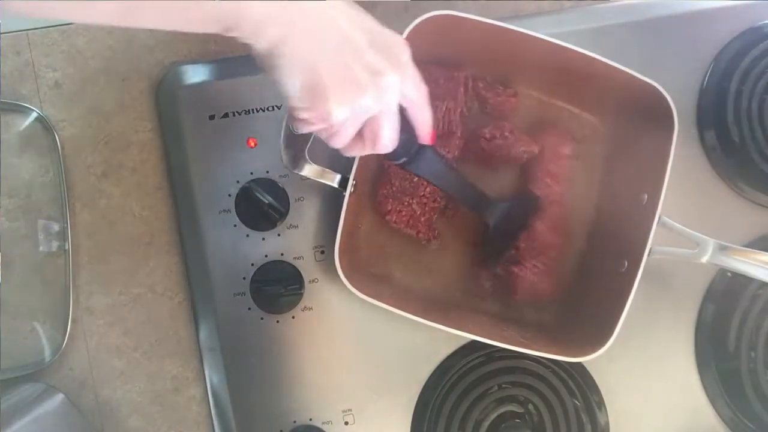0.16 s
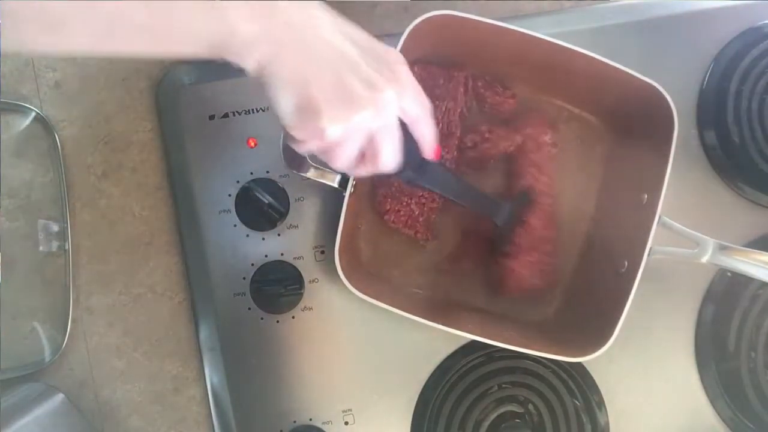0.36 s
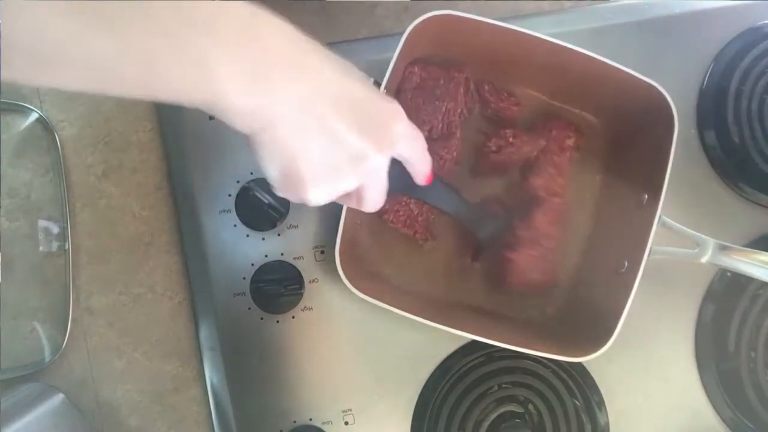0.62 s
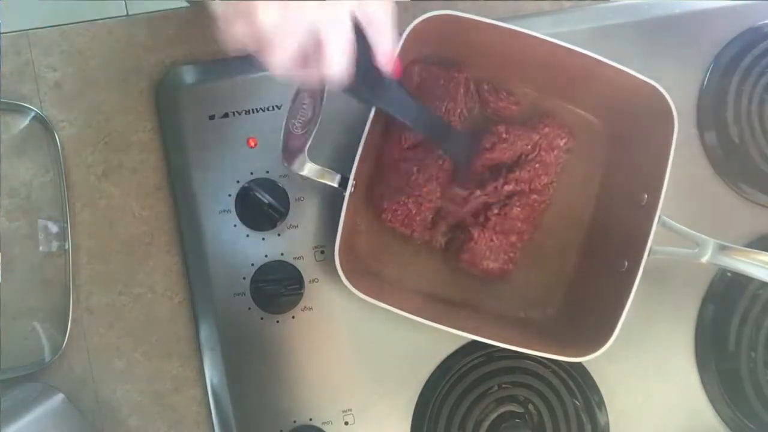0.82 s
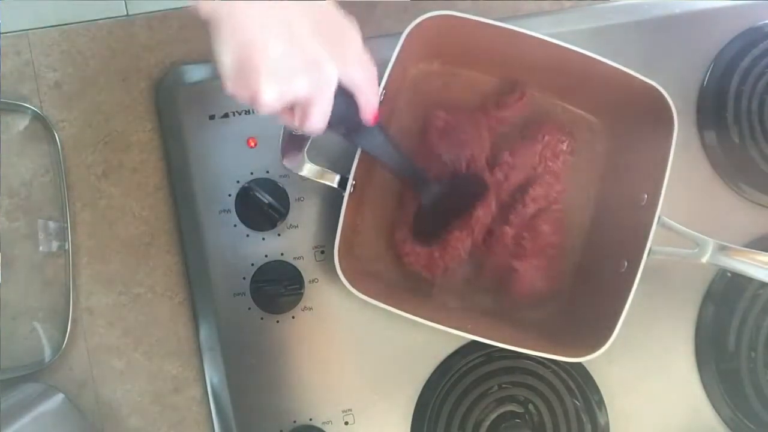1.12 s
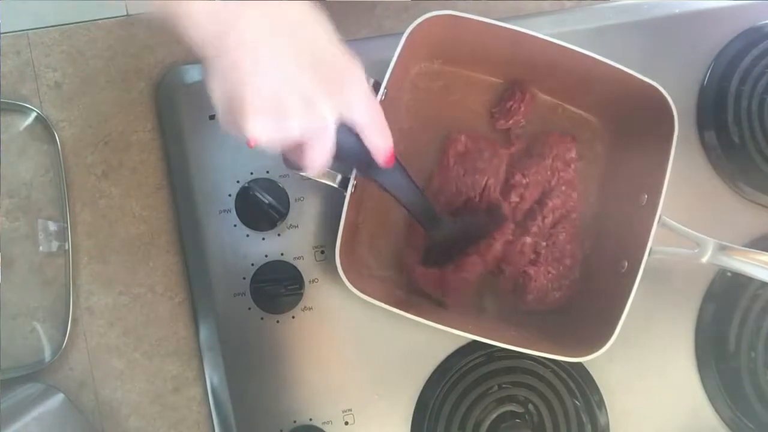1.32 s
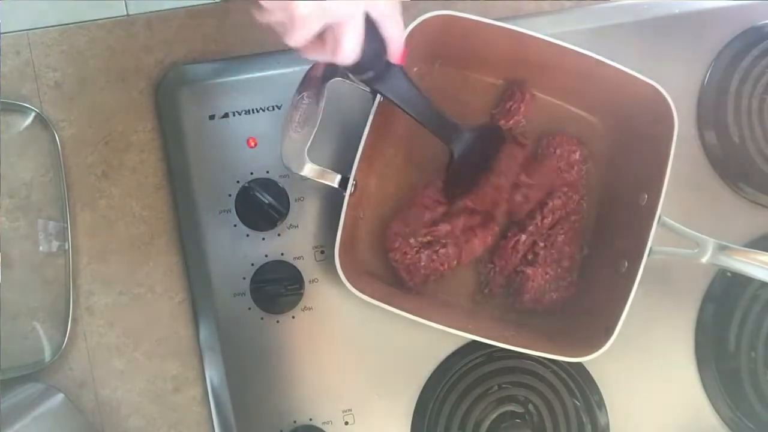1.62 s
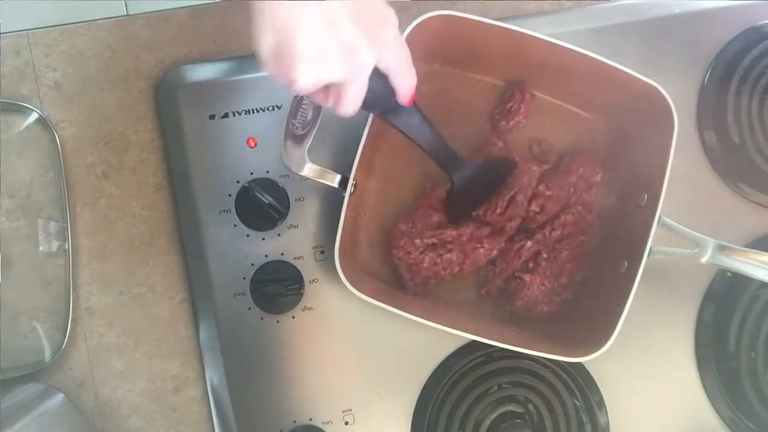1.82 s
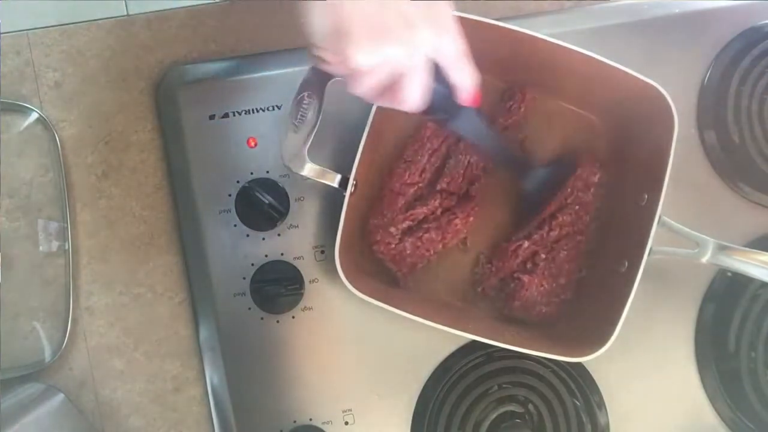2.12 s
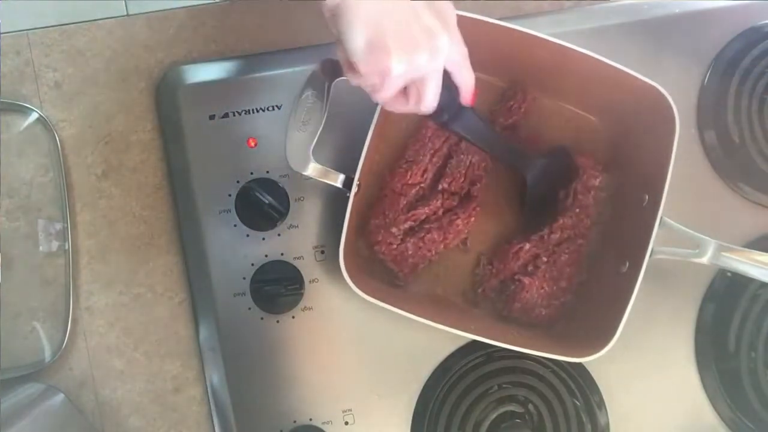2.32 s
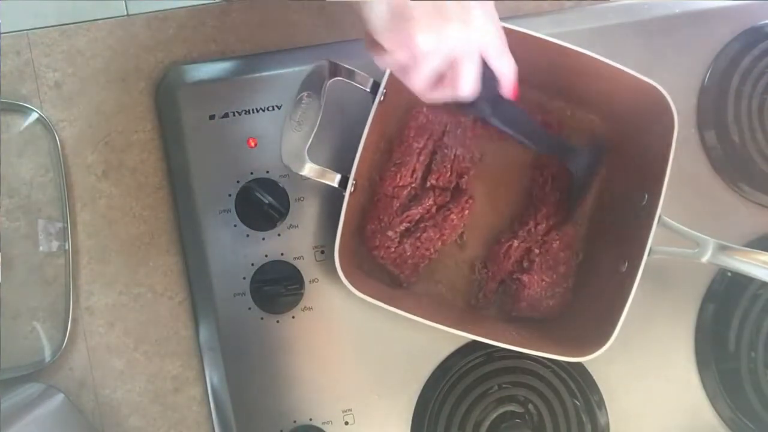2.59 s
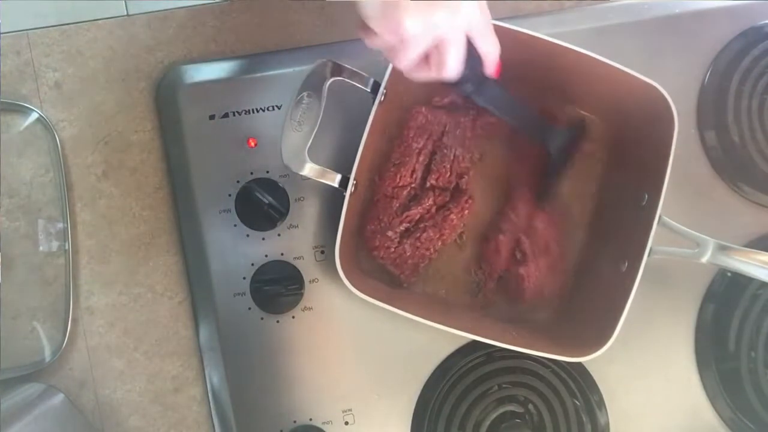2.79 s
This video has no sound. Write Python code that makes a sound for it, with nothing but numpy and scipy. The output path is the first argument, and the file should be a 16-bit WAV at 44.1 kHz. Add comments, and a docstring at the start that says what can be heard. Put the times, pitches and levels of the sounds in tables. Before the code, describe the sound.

Ground meat sizzles densely and steadily in hot oil for about 3 seconds, close up, left channel only. Spits and crisp snaps pepper it, clustered around 0.2 and 0.6-0.9, with sharp cracks near 2.3 and 2.5. A plastic utensil taps the pan dully at 0.17 and 1.1, harder around 2.3-2.45 and 2.8. Faint low drags come at 1.0 and 2.5-2.75, over barely audible kitchen rumble and hum.

```python
"""Meat frying in a pan

Ground meat fries in hot oil while a plastic utensil pushes it about, over a low kitchen rumble and hum.
Thousands of random filtered clicks a second make the steam bubbles; noise makes the hiss beneath them.
Spits are quick volleys of clicks, snaps are single clicks, and knocks add a fading ring of the pan.
Drags mix a wavering low tone with rubbing noise. Only the left channel carries sound."""
import sys
import numpy as np
from scipy import signal
from scipy.fft import rfft, irfft
from scipy.io import wavfile

SR = 44100
rng = np.random.default_rng(int(sys.argv[2]) if len(sys.argv) > 2 else 0)


def output_pcm(signal):
    """Save a mono or channel-first signal as 16-bit PCM at the path in sys.argv[1].

    Samples are clipped to [-1, 1] before scaling.
    """
    pcm = np.clip(np.atleast_2d(signal).T, -1, 1) * 32767
    wavfile.write(sys.argv[1], SR, np.round(pcm).astype(np.int16))


N = 130095  # length in samples

# All levels below are before the room echoes and the microphone gain.
# tone colour of the frying, relative: f/Hz, level/dB
SIZZLE_COLOUR = [(100, -26.5), (300, -51), (430, -24.5), (620, -25), (820, -20.5), (1050, -13), (1400, -11),
                 (1900, -7), (2350, -6.5), (2600, -1.85), (2900, -0.5), (3500, -2.5), (4400, -1.5),
                 (4900, -7.5), (5350, -3.5), (5750, -5), (6050, -7.5), (6650, -5), (7400, -11),
                 (9700, -13.5), (10400, -18.5), (11100, -15), (12300, -15.5), (15700, -18.5)]
# strength of the frying over time: t/s, level/dB
FRYING_LEVEL = [(0, -25.5), (.11, -25.5), (.15, -24), (.23, -26), (.28, -26), (.39, -25.5), (.6, -26.5),
                (.68, -27.5), (.8, -26.5), (.91, -26), (.98, -25.5), (1.1, -25.5), (1.3, -25.5), (1.5, -26),
                (1.72, -26.5), (1.85, -26.5), (2.1, -25.5), (2.27, -26.5), (2.55, -26), (2.95, -26.5)]
# boost or cut of the frying's treble over time: t/s, level/dB
TREBLE_LEVEL = [(0, -1.5), (.1, 0), (.3, 1), (.46, 0.5), (.62, 3.5), (.8, 2), (1.0, -1.5), (1.3, -0.2),
                (1.9, 0), (2.1, 0.5), (2.3, -1), (2.5, 2.5), (2.73, -.5), (2.84, 2), (2.95, .3)]
# tone colour of the kitchen rumble, relative: f/Hz, level/dB
RUMBLE_COLOUR = [(15, -33), (26, -27), (39, 2), (52, -2), (72, -9), (110, -7.5), (160, -13.5), (300, -21.5),
                 (600, -33), (3000, -41)]
# ways the pan rings, damped by the meat: f/Hz, relative level/dB, time to fade by 60 dB/s
PAN_MODES = [(368.5, -13, 0.15), (525, -7.5, 0.24), (692, -9.5, 0.36), (786, -3.5, 0.14), (893, -1.5, 0.11),
             (1054, 4, 0.078), (1297, 2.5, 0.081), (1648, 3.5, 0.13), (2660, 6.5, 0.074), (4650, -4, 0.026)]
# utensil knocks on the pan: t/s, peak level/dB, centre f/Hz
KNOCKS = [(0.1675, -19, 1700), (.3578, -26, 855), (0.789, -32, 800), (.9225, -27, 910), (1.1199, -20, 1050),
          (1.357, -29.5, 786), (1.4252, -29.5, 925), (2.0304, -26.5, 1010), (2.08, -32, 860),
          (2.311, -17, 1290), (2.4142, -15, 1600), (2.44, -16.5, 1470), (2.488, -27, 900),
          (2.6688, -30, 895), (2.8005, -18.5, 1400), (2.9403, -24.5, 960)]
# spits, short volleys of large bubbles: t/s, level/dB, centre f/Hz before colouring, length/s
SPITS = [(.168, -26, 2160, .008), (0.184, -28.5, 1900, .011), (0.211, -27, 2540, .008),
         (0.309, -26, 2920, .005), (.357, -25.5, 3020, 0.011), (.447, -27, 3060, 0.0058),
         (.528, -24, 3020, 0.007), (0.55, -23.5, 2720, .008), (0.614, -23, 2980, .008),
         (0.629, -22.5, 2860, 0.0086), (0.726, -29, 2260, .007), (0.744, -24, 2780, .006),
         (0.817, -24.5, 3200, 0.0045), (0.853, -24, 2930, .008), (0.884, -26, 2300, 0.0047),
         (1.116, -24, 2830, .008), (1.227, -23, 2380, .006), (1.363, -23.5, 2600, 0.0085),
         (1.428, -40, 4000, .005), (1.438, -24, 3360, .005), (1.568, -25, 2640, .008),
         (1.597, -27, 2920, 0.0097), (1.632, -25, 2320, .007), (1.641, -23, 3230, .006),
         (1.693, -24, 2820, 0.0089), (1.719, -24, 2340, 0.0057), (1.964, -24, 2280, 0.0064),
         (2.087, -28, 3120, 0.0089), (2.236, -27, 2310, .006), (2.305, -31, 3600, .007),
         (2.392, -30, 3400, 0.0059), (2.412, -29, 2480, 0.0062), (2.438, -23.5, 2670, .006),
         (2.491, -30, 2980, 0.0099), (2.524, -24, 3030, 0.0058), (2.758, -32, 1690, 0.011)]
# snaps, single bursting drops: t/s, peak level/dB, centre f/Hz before colouring
SNAPS = [(0.2154, -12, 3000), (0.2208, -11, 4000), (0.234, -17, 4500), (0.244, -15, 4500),
         (0.252, -15, 4500), (.271, -13, 11000), (0.619, -17, 3800), (.637, -17, 2600), (.8566, -16, 3200),
         (0.8974, -13, 4500), (0.9044, -10, 12000), (1.0189, -14, 13000), (1.1071, -11, 10000),
         (1.2071, -15, 4500), (1.3595, -11, 8600), (1.6625, -12, 4500), (1.9707, -22, 3500),
         (2.3087, -8.5, 4200), (2.4404, -24, 3000), (2.4998, -9, 6000)]
# utensil drags over the pan bottom: t/s, length/s, level of the slip tone/dB, slip f/Hz
DRAGS = [(1.001, 0.19, -60, 322), (2.475, 0.155, -51, 257.5), (2.632, 0.13, -53, 304)]
# tone colour of the rubbing, relative: f/Hz, level/dB
RUB_COLOUR = [(20, -10), (42, 14), (75, -6), (120, -2), (180, -0.5), (350, -1), (470, -9), (1000, -40),
              (4000, -60)]

# small bubbles: total rate, mean and greatest boost of random sizes, width of each size's tone, level
POPS_PER_S, POP_SPREAD_DB, POP_MAX_DB, POP_OCTAVES, POP_DB = 14000, 2, 12, 0.43, -0.7
# slow random swings: rough time scale and strength, for clumps of bubbles and for the whole frying
CLUMP_S, CLUMP_DB, SURGE_S, SURGE_DB = 0.008, 1.2, 0.017, 0.07
HISS_DB, PAN_RING_DB, TREBLE_HZ = -7, -46.5, 6600
# larger bubbles: total rate, pitch range, cycles to fade to about a third, level
BUBBLES_PER_S, BUBBLE_LOW_HZ, BUBBLE_HIGH_HZ, BUBBLE_CYCLES, BUBBLE_DB = 450, 1001, 6017, 10.2, -8.5
RUMBLE_DB, HUM_HZ, HUM_DB = -59.5, 58, -60.5
# ring and bounce levels are relative to the first tick of a knock
KNOCK_RING_DB, KNOCK_OCTAVES, BOUNCE_S, BOUNCE_DB = -14, 0.72, 0.00196, -10.5
SPIT_PER_S, SPIT_OCTAVES, SNAP_OCTAVES = 2000, 0.38, 1
SLIP_JITTER, RUB_DB = 0.047, 3.5  # pitch wobble as a fraction; rubbing relative to the slip tone
ROOM_T60_S, ROOM_DB = 0.15, -6
MIC_GAIN_DB, EDGE_HZ = 5.5, 15740


def amp(db):
    """Turns decibels into gain."""
    return 10 ** (np.asarray(db) / 20)


def unit(x):
    """Scales a sound to an average strength (rms) of 1."""
    return x / np.sqrt(np.mean(x ** 2) + 1e-20)


def bins():
    """Frequencies on which colours are drawn, shifted by 1 Hz to avoid log of zero."""
    return np.fft.rfftfreq(4096, 1 / SR) + 1


def colour(points):
    """Gain per frequency, drawn between (Hz, dB) points on a musical pitch scale."""
    hz, db = np.transpose(points)
    return amp(np.interp(np.log(bins()), np.log(hz), db))


def bump(hz, octaves):
    """A broad hump of gain round one pitch."""
    return np.exp(-0.5 * (np.log2(bins() / hz) / octaves) ** 2)


def click(gain):
    """A click with this gain per frequency and its energy as early as possible (minimum phase)."""
    cepstrum = irfft(np.log(np.maximum(gain, 1e-5)))
    half = len(cepstrum) // 2
    # fold the mirrored half forward, so nothing sounds before the click
    cepstrum[1:half] *= 2
    cepstrum[half + 1:] = 0
    return irfft(np.exp(rfft(cepstrum)))[:half]


def ring(x, impulse):
    """Starts a copy of the impulse at every sample of x, scaled by that sample."""
    return signal.fftconvolve(x, impulse)[:len(x)]


def level(points):
    """Gain per sample from (s, dB) points."""
    return amp(np.interp(np.arange(N) / SR, *np.transpose(points)))


def wander(seconds):
    """Smooth random swings of rms 1; a longer time makes them slower."""
    hz = np.fft.rfftfreq(N, 1 / SR)
    noise = rfft(rng.standard_normal(N))
    return unit(irfft(noise * np.exp(-(hz * seconds) ** 2), N))


def add(mix, s, sound):
    """Mixes a sound in at a time."""
    part = mix[max(round(s * SR), 0):][:len(sound)]
    part += sound[:len(part)]


def bursts(per_s):
    """Random impulses of either sign, many small and a few large."""
    size = amp(np.minimum(POP_SPREAD_DB * rng.exponential(1, N), POP_MAX_DB))
    sign = rng.choice([-1, 1], N)
    return size * sign * (rng.random(N) < per_s / SR)


def room(x):
    """Adds sparse, fading reflections from stove top and walls, drawn anew each time it is used."""
    t = np.arange(SR // 4) / SR
    taps = rng.choice([-1, 1], len(t)) * (rng.random(len(t)) < 2000 / SR)
    taps = taps * (t > 0.002) * amp(-60 * t / ROOM_T60_S)
    return x + amp(ROOM_DB) * ring(x, taps / np.linalg.norm(taps))


def pan_impulse():
    """The pan's ring after one impulse: a sum of fading sine waves."""
    t = np.arange(SR // 4) / SR
    return sum(amp(db - 60 * t / t60) * np.sin(2 * np.pi * hz * t) for hz, db, t60 in PAN_MODES)


def bubbles(count=28):
    """Larger bubbles of juice ring as short fading sines, at a set of spaced pitches."""
    t, out = np.arange(SR // 30) / SR, np.zeros(N)
    for hz in np.geomspace(BUBBLE_LOW_HZ, BUBBLE_HIGH_HZ, count):
        blip = np.sin(2 * np.pi * hz * t) * np.exp(-hz * t / BUBBLE_CYCLES)
        strength = np.interp(hz, bins(), colour(SIZZLE_COLOUR))
        out += strength * unit(ring(bursts(BUBBLES_PER_S / count), blip))
    return unit(room(out))


def sizzle(count=16):
    """Bubbles of many sizes burst in clumps over a smooth steam hiss, with a faint ring of the pan."""
    sizes = np.array([bump(hz, POP_OCTAVES) for hz in np.geomspace(600, 15000, count)])
    sizes /= np.sqrt((sizes ** 2).sum(0))  # together the sizes keep the overall colour
    tone = colour(SIZZLE_COLOUR)
    pops = np.zeros(N)
    for size in sizes:
        clumped = bursts(POPS_PER_S / count) * amp(CLUMP_DB * wander(CLUMP_S))
        pops += room(ring(unit(clumped), click(tone * size)))
    hiss = ring(rng.standard_normal(N), click(tone))
    fry = amp(POP_DB) * unit(pops) + amp(HISS_DB) * unit(hiss) + amp(BUBBLE_DB) * bubbles()
    fry = fry * level(FRYING_LEVEL) * amp(SURGE_DB * wander(SURGE_S))
    high_pass = signal.butter(2, TREBLE_HZ, "high", fs=SR, output="sos")
    treble = signal.sosfiltfilt(high_pass, fry)
    pan_ring = amp(PAN_RING_DB) * unit(ring(bursts(POPS_PER_S), pan_impulse()))
    return fry + treble * (level(TREBLE_LEVEL) - 1) + pan_ring


def kitchen():
    """Low room rumble from coloured noise, and a steady hum from one sine."""
    hum = unit(np.sin(2 * np.pi * HUM_HZ * np.arange(N) / SR))
    rumble = unit(ring(rng.standard_normal(N), click(colour(RUMBLE_COLOUR))))
    return amp(RUMBLE_DB) * rumble + amp(HUM_DB) * hum


def knocks():
    """The plastic edge lands with a dull tick, bounces once and leaves a damped ring in the pan."""
    out, pan = np.zeros(N), pan_impulse()
    for s, db, hz in KNOCKS:
        tick = click(bump(hz, KNOCK_OCTAVES) + amp(-50))
        tick = amp(db) * tick / abs(tick).max()
        add(out, s, tick)
        add(out, s + BOUNCE_S, amp(BOUNCE_DB) * tick)
        add(out, s, amp(db + KNOCK_RING_DB) * pan / abs(pan).max())
    return out


def spits():
    """A pocket of juice meets the oil and bursts in a quick volley of unevenly spaced clicks."""
    out = np.zeros(N)
    for s, db, hz, length in SPITS:
        n, strikes = max(int(length * SR), 2), np.zeros(SR // 10)
        place, side = rng.random((2, 64))
        count = int(np.clip(length * SPIT_PER_S, 2, len(place)))
        # one strike at a random place in each equal slice of the volley
        when = ((np.arange(count) + place[:count]) / count * n).astype(int)
        strikes[when] = np.sign(side[:count] - 0.5)
        volley = ring(strikes, click(colour(SIZZLE_COLOUR) * bump(hz, SPIT_OCTAVES)))
        add(out, s, amp(db) * volley * np.sqrt(n) / np.linalg.norm(volley))
    return out


def snaps():
    """Single drops explode with one sharp crack each."""
    out = np.zeros(N)
    for s, db, hz in SNAPS:
        crack = click(colour(SIZZLE_COLOUR) * bump(hz, SNAP_OCTAVES))
        add(out, s, -amp(db) * crack / abs(crack).max())
    return out


def drags():
    """The utensil sticks and slips along the bottom: a wavering tone and rubbing noise make a low groan."""
    out = np.zeros(N)
    for s, length, db, hz in DRAGS:
        n = int(length * SR)
        slip_hz = hz * (1 + SLIP_JITTER * wander(0.029))
        slip = unit(np.sin(2 * np.pi * np.cumsum(slip_hz) / SR))
        rub = unit(ring(rng.standard_normal(N), click(colour(RUB_COLOUR))))
        groan = (slip + amp(RUB_DB) * rub)[:n]
        add(out, s, amp(db) * groan * signal.windows.tukey(n, 0.5))  # fade in and out
    return out


def scene():
    """The pan in the kitchen on the left channel, silence on the right."""
    pan = sizzle() + room(knocks() + spits() + snaps() + drags())
    return np.array([pan + kitchen(), np.zeros(N)])


def record(dry):
    """The microphone's gain, and a steep filter that removes the highest treble."""
    low_pass = signal.firwin(1201, EDGE_HZ, window=("kaiser", 9), fs=SR)
    return signal.oaconvolve(amp(MIC_GAIN_DB) * dry, low_pass[None], "same", axes=1)


dry = scene()
out = record(dry)
output_pcm(out)
```